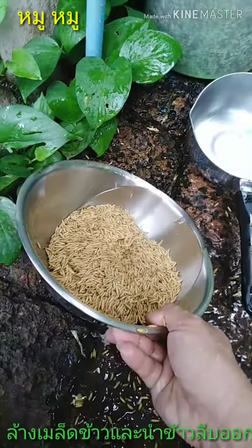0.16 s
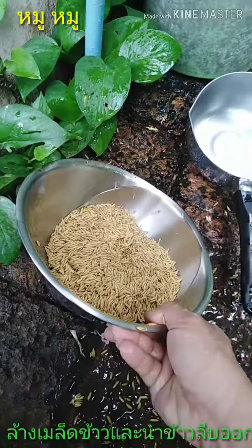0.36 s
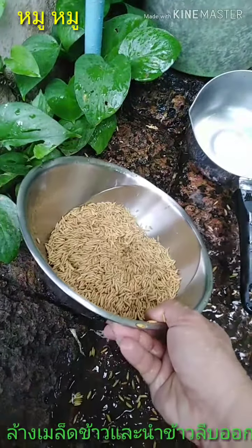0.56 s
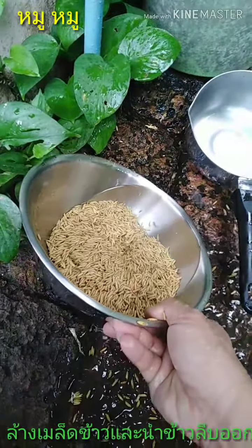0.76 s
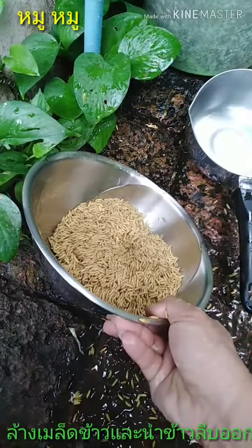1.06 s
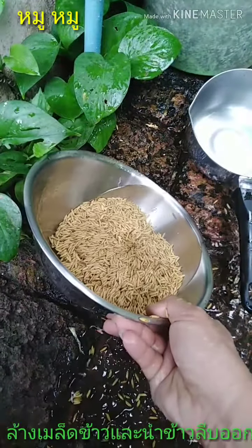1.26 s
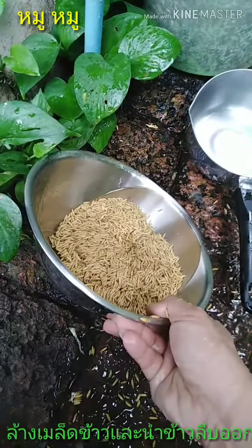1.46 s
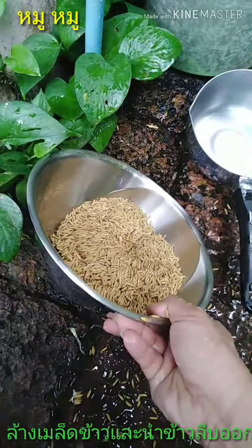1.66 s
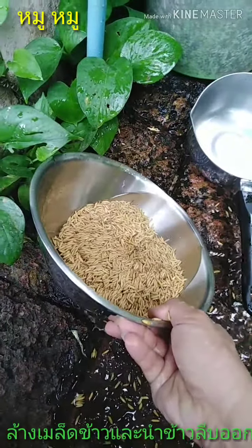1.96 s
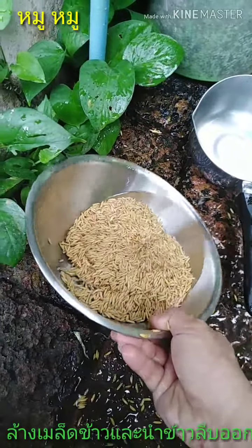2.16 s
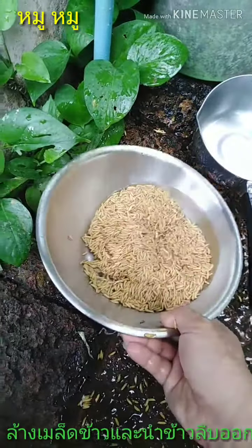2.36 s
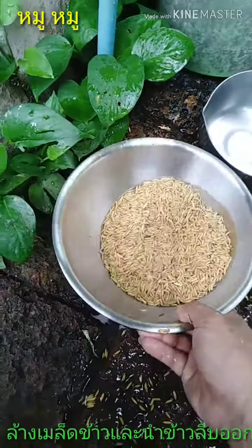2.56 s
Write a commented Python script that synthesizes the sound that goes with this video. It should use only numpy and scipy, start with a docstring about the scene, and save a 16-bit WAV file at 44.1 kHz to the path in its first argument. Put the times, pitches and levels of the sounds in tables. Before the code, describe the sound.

Wet grain rustles in a metal bowl with fine fizzing water, crisp ticks and tiny drips; a hen clucks once early, a bird whistles twice later, then the bowl knocks. Close microphone outdoors, faint traffic rumble.

```python
"""Wet grain drains in a tilted steel bowl held in a garden: clicks over noise make the grain rustle,
the water fizz and a lower trickle; noise puffs tick and short tones drip.
The bowl knocks as ringing modes and drags as wide noise. A bird whistles two scooped tones,
a hen clucks once as rough pulses through a throat, and far traffic rumbles as shaped noise."""
import sys
import numpy as np
from scipy import signal
from scipy.io import wavfile
from scipy.ndimage import uniform_filter1d

SR = 44100
rng = np.random.default_rng(int(sys.argv[2]) if len(sys.argv) > 2 else 0)


def pcm_store(signal):
    """Save signal as 16-bit PCM."""
    levels = np.round(np.clip(np.atleast_2d(signal), -1, 1) * 32767)
    wavfile.write(sys.argv[1], SR, levels.astype(np.int16).T)


N = 119070

# Grain shifting in the bowl: time_s, level_db
RUSTLE_LEVEL = [(0, -56), (.2, -55), (.29, -65.5), (.31, -65), (.33, -51), (.42, -59), (.5, -62),
                (.62, -65.5), (.76, -73), (.8, -59), (1.17, -57), (1.27, -67.5), (1.31, -68), (1.6, -67),
                (1.9, -66), (2.02, -88.5), (2.2, -74), (2.3, -66.5), (2.38, -55), (2.5, -51), (2.54, -43),
                (2.7, -50.5)]
# Grain spectrum: freq_hz, density_db (per Hz, relative)
RUSTLE_SPECTRUM = [(3200, -100), (4300, -12.5), (5200, -2), (6500, 0.5), (7800, -0.5), (8800, -8),
                   (12000, -38), (14500, -63)]
# Fine fizz of draining water: time_s, level_db
FIZZ_LEVEL = [(0, -63.5), (.3, -65.5), (.33, -56), (.55, -65.5), (1.1, -65), (1.2, -69), (1.3, -83),
              (1.33, -67.5), (1.62, -66), (1.9, -64.5), (2.0, -72), (2.08, -79.5), (2.3, -80),
              (2.38, -63.5), (2.52, -58.5), (2.55, -56), (2.7, -62.5)]
# Fizz spectrum: freq_hz, density_db (per Hz, relative)
FIZZ_SPECTRUM = [(6500, -45.5), (8500, 0), (10500, 3.5), (12500, -1.5), (14200, -3.5), (14700, -64)]
# Lower trickle: time_s, level_db
TRICKLE_LEVEL = [(0, -67), (.1, -79.5), (.31, -86), (.34, -66.5), (.55, -77), (.75, -75), (1.28, -87),
                 (1.31, -70.5), (1.5, -69), (1.65, -65.5), (1.9, -57), (2.02, -72.5), (2.1, -114),
                 (2.27, -79), (2.32, -62), (2.5, -65), (2.54, -52), (2.7, -60)]
# Trickle spectrum: freq_hz, density_db (per Hz, relative)
TRICKLE_SPECTRUM = [(1500, -47), (2300, -47), (2750, 19.5), (3100, 9), (3400, 20), (3750, 13), (4000, 18.5),
                    (4350, 18.5), (5000, 6), (6500, -51)]
# Splashy ticks: start_s, level_db, centre_hz, pan_db (left over right), width_hz (each pass), decay_s
TICK_EVENTS = [(0.019, -36.5, 11700, -1, 3020, 0.0031), (0.165, -39, 7500, 20, 800, 0.0032),
               (0.2035, -17, 7920, 0, 2000, 0.002), (0.318, -31, 5960, 17, 2400, 0.0037),
               (0.344, -39, 4400, 6, 1520, 0.0019), (0.5038, -31.5, 5460, 13.5, 4030, 0.0056),
               (0.375, -38, 6560, 10, 4000, 0.0023), (0.391, -32, 5960, 11, 4970, 0.0014),
               (0.774, -48.5, 7500, 29, 990, 0.0035), (0.813, -48.5, 5700, 27.5, 1500, 0.0072),
               (0.958, -39, 10700, -9, 3500, 0.0036), (0.989, -45, 11500, -11, 2500, 0.0032),
               (1.018, -45, 7240, 21, 2000, 0.0028), (1.063, -49, 13000, -14, 3000, 0.003),
               (1.101, -40, 11100, -16, 2000, 0.0024), (1.102, -44, 6100, 18, 1490, 0.0025),
               (1.134, -36, 5700, 22, 2000, 0.002), (1.143, -39.5, 5550, 29, 1770, 0.0022),
               (1.155, -37, 5660, 19, 1790, 0.0017), (1.164, -40.5, 5300, 13, 1200, 0.0034),
               (1.263, -45.5, 6100, 18, 1950, 0.0047), (1.3293, -37, 10300, -12, 3040, 0.0026),
               (1.3707, -41.5, 8200, 3, 4000, 0.0054), (1.438, -38.5, 10550, -8, 2000, 0.0044),
               (1.442, -32.5, 5350, 8.5, 1220, 0.0039), (1.457, -43, 6130, 7, 3000, 0.0037),
               (1.553, -46, 11800, 2, 5000, .002), (1.586, -48, 11500, -2, 2500, 0.0015),
               (1.595, -40, 13000, -2, 2000, 0.0048), (1.611, -26.5, 10860, -8, 1500, 0.002),
               (1.624, -28.5, 6000, 7, 1210, 0.002), (1.741, -45.5, 10360, -11, 1500, 0.0086),
               (1.8186, -46, 5560, 21, 2000, 0.0042), (1.863, -37.5, 8000, 7, 5070, 0.0028),
               (1.912, -42, 4400, 15, 3060, 0.0015), (2.159, -48.5, 5930, 20.5, 495, 0.0051),
               (2.209, -42.5, 5400, 21.5, 2500, 0.0025), (2.3014, -31, 4380, 0, 1540, 0.0021),
               (2.242, -46, 6800, 7, 900, 0.003), (2.277, -40.5, 5700, -3, 1500, 0.0043),
               (2.3513, -29, 6000, 20, 845, 0.003)]
# Tuned drips: start_s, level_db, pitch_hz, pan_db (left over right), length_s (envelope scale)
DRIP_EVENTS = [(0.744, -58.5, 2690, 11, 0.0094), (0.787, -61, 3250, -22, 0.0026),
               (1.303, -43, 4510, 10, 0.0018), (1.304, -59, 3050, -6, 0.006),
               (1.393, -46.5, 4575, 7, 0.0055), (1.5, -59, 2720, 9, 0.0092), (1.523, -60, 2740, 5, 0.0075),
               (1.557, -42.5, 4580, 10, 0.0038), (1.557, -63.5, 3220, 24, 0.0042),
               (1.594, -45.5, 2610, 2, 0.0018), (1.624, -53.5, 2685, 3, 0.0073),
               (1.910, -47, 2565, 0, 0.0032), (1.911, -46, 3280, -8, 0.0029),
               (2.422, -59, 2430, -11, 0.003)]
# Bowl knocks: start_s, level_db, bright_db (per octave about 500 Hz), contact_s,
# upper_db (raises the upper ring, lowers the two middle modes)
KNOCK_EVENTS = [(2.5309, -10.5, 3, 0.00066, -5), (2.5418, -26, -6.5, 0.0018, -11),
                (2.626, -14.5, 2, 0.00054, 10), (2.6307, -29.5, 4.5, 0.00033, 7),
                (2.654, -27, 10, 0.00087, 7)]
# Bowl modes: freq_hz, level_db, t60_s, pan_db (left over right)
BOWL_MODES = [(289, -3.5, 0.049, 3), (349.4, -15, 0.7, -3), (381.7, 3, 0.086, 3.5),
              (577, -10.5, 0.017, -18), (735, 0.5, 0.011, -7), (845, -12, 0.03, -1), (1140, -12, 0.01, -9),
              (1340, -36, 0.31, -2.5), (1626, -25, 0.017, -14), (2340, -17, .012, -14)]
# Bird whistles: start_s, length_s, pitch_hz, level_db, pan_db (left over right),
# scoop_hz (start below pitch), scoop_s, sag_db (by the end)
WHISTLE_NOTES = [(2.008, .166, 2338, -50, -4, 270, .05, -2), (2.232, .125, 3070, -51, -5, 330, .02, -10)]
# Hen throat resonances: freq_hz, width_hz (each pass), level_db
THROAT_RESONANCES = [(710, 74, 10.5), (1096, 347, 15), (1580, 100, -1.5), (1900, 140, -8), (2884, 84, 8.5),
                     (4200, 910, 2.5)]
# Traffic spectrum: freq_hz, density_db (per Hz, relative)
RUMBLE_SPECTRUM = [(20, -77), (38, -22), (52, -9), (70, 1.5), (125, -2.5), (200, -13.5), (400, -19),
                   (650, -27), (950, -35.5), (1150, -52.5), (2200, -54.5), (3200, -67), (9000, -78)]
# Traffic stereo: freq_hz, likeness (left-right, 0 to 1)
RUMBLE_LIKENESS = [(60, 1), (190, 0.97), (350, 0.88), (650, 0.099), (1500, 0.24)]

SPRAY_HZ, SPRAY_WIDTH_HZ, SPRAY_DB = 9650, 3000, -8
DRIP_GLIDE = 0.012  # fraction of pitch
WET_TAIL_DB, WET_TAIL_T60_S = 3, 0.017
MIDDLE_HZ, UPPER_HZ = 640, 840  # where the bowl is struck trades these rings
BOWL_TAIL_DB, BOWL_TAIL_T60_S = -9, 0.075
SCRAPE_S, SCRAPE_RISE_S, SCRAPE_DB = 2.535, 0.0051, -50.5
SCRAPE_HZ, SCRAPE_WIDTH_HZ = 1520, 10600
SWELL_DB, STOP_S, FLUTTER_DB, WAVER_HZ = -16, 0.01, 1.8, 18
CLUCK_S, CLUCK_HZ, CLUCK_DB, CLUCK_PAN_DB = 0.352, 396.5, -38.5, -3.5
CLUCK_RISE_S, CLUCK_T60_S, CLUCK_ROUGH = 0.041, 0.15, 0.76
GARDEN_DB, GARDEN_T60_S = -4, 0.42
RUMBLE_DB = -40.5
BASS_CUT_HZ, EDGE_HZ = 42, 15300


def amp(db):
    """dB to gain."""
    return 10 ** (np.asarray(db) / 20)


def evened(x):
    """Scales to rms 1."""
    x = np.asarray(x)
    return x / np.sqrt(np.mean(x ** 2) + 1e-20)


def drift(x, size):
    """Noise smoothed twice over size samples, rms 1."""
    return evened(uniform_filter1d(uniform_filter1d(x, size), size))


def read(points, hz):
    """Reads a curve on a log-frequency axis."""
    f, value = np.transpose(points)
    return np.interp(np.log(hz + 1), np.log(f + 1), value)


def panned(pan_db):
    """Left and right level offsets in dB, as a column."""
    return np.array([[pan_db / 2], [-pan_db / 2]])


def add(mix, start_s, sound, pan_db):
    """Mixes a sound in at start_s; positive pan leans left."""
    part = mix[:, round(start_s * SR):][:, :len(sound)]
    part += amp(panned(pan_db)) * sound[:part.shape[1]]


def resonate(x, hz, width_hz, passes):
    """A resonance of gain about 1 at its centre, applied several times."""
    turn = np.exp(2j * np.pi * hz * np.arange(len(x)) / SR)
    r = np.exp(-np.pi * abs(width_hz) / SR)
    for _ in range(passes):
        x = 2 * (turn * signal.lfilter([1 - r], [1, -r], x / turn)).real
    return x


def coloured(x, spectrum, patchy_db, size):
    """Shapes two channels by a spectrum with drifting patches common to both; rms 1."""
    overlap = size * 3 // 4
    hz, _, z = signal.stft(x, SR, nperseg=size, noverlap=overlap)
    patches = rng.standard_normal(z.shape[1:])
    patches = evened(uniform_filter1d(uniform_filter1d(patches, 6, 0), 12, 1))
    z = z * amp(read(spectrum, hz)[:, None] + patchy_db * patches)
    shaped = signal.istft(z, SR, nperseg=size, noverlap=overlap)[1]
    return evened(shaped[:, :N])


def tail(x, t60_s):
    """A diffuse decaying noise tail of energy about 1, different per channel."""
    t = np.arange(SR // 2) / SR
    h = rng.standard_normal((2, len(t))) * amp(-60 * t / t60_s)
    return signal.fftconvolve(x, h / np.linalg.norm(h[0]), axes=1)[:, :N]


def patter(curve, spectrum, per_s, spread_db, smooth, alike, pan_db, patchy_db, flicker_db):
    """Dense tiny clicks of uneven size over smooth noise, on a level curve that flickers."""
    sizes = amp(spread_db * np.minimum(rng.exponential(1, (3, N)), 5))
    clicks = sizes * (rng.random((3, N)) < per_s / SR)
    raw = evened(clicks * rng.standard_normal((3, N))) + smooth * rng.standard_normal((3, N))
    pair = raw[:2] + alike * raw[2]  # third stream is common to both channels
    sound = coloured(pair, spectrum, patchy_db, size=256)
    flicker = drift(rng.standard_normal(N), 500)
    s, db = np.transpose(curve)
    level_db = np.interp(np.arange(N) / SR, s, db) + flicker_db * flicker
    return sound * amp(level_db + panned(pan_db))


def rustle():
    """Shifting grain: dense clicks over noise, strongest around 5 to 8 kHz."""
    return patter(RUSTLE_LEVEL, RUSTLE_SPECTRUM, per_s=1500, spread_db=3.0, smooth=0.8,
                  alike=0.4, pan_db=6.5, patchy_db=2.5, flicker_db=1.5)


def fizz():
    """Draining water: sparser, more uneven clicks over noise, above about 8 kHz."""
    return patter(FIZZ_LEVEL, FIZZ_SPECTRUM, per_s=700, spread_db=4.6, smooth=0.9,
                  alike=0.6, pan_db=-8, patchy_db=3.2, flicker_db=2.5)


def trickle():
    """Lower trickle: clicks over noise in several bands from about 2.7 to 5 kHz."""
    return patter(TRICKLE_LEVEL, TRICKLE_SPECTRUM, per_s=1000, spread_db=-6.5, smooth=0.97,
                  alike=0.13, pan_db=-1.5, patchy_db=4.0, flicker_db=2.0)


def ticks():
    """Each tick is a noise puff in a resonance, with a broad bright spray."""
    mix, t = np.zeros((2, N)), np.arange(1500) / SR
    for start_s, db, hz, pan_db, width_hz, decay_s in TICK_EVENTS:
        puff = rng.standard_normal(len(t))
        shape = np.minimum(t * 1500, 1) * np.exp(-(t / decay_s) ** 2)
        # second differences tilt the noise to the treble
        edge = np.diff(puff * shape, n=2, prepend=[0, 0])
        tick = resonate(edge, hz, width_hz, passes=3)
        tick /= np.sqrt(np.mean(tick ** 2) / np.mean(shape ** 2))
        spray_edge = np.diff(puff[::-1] * shape, n=2, prepend=[0, 0]) / 3
        spray = resonate(spray_edge, SPRAY_HZ, SPRAY_WIDTH_HZ, passes=2)
        add(mix, start_s, amp(db - 14) * (tick + amp(SPRAY_DB) * spray), pan_db)
    return mix


def drips():
    """Each drip is a short tone gliding upward, with a small noise splash below its pitch."""
    mix, t = np.zeros((2, N)), np.arange(1500) / SR
    for start_s, db, hz, pan_db, length_s in DRIP_EVENTS:
        u = t / length_s
        puff = rng.standard_normal(len(t)) * np.exp(-t / 0.0022)
        splash = resonate(puff, 0.81 * hz, 2500, passes=2)
        add(mix, start_s, amp(db - 8) * splash, pan_db)
        tone = np.sin(2 * np.pi * hz * t * (1 + DRIP_GLIDE * (u - 1)))
        add(mix, start_s, amp(db) * 1.63 * u * np.exp(-u ** 2) * tone, pan_db)
    return mix


def drops():
    """Ticks and drips with a short diffuse wet tail."""
    mix = ticks() + drips()
    return mix + amp(WET_TAIL_DB) * tail(mix, WET_TAIL_T60_S)


def knocks():
    """Each knock is a short smooth push ringing the same modes; every mode leans its own way."""
    mix, t = np.zeros((2, N)), np.arange(SR // 4) / SR
    for start_s, db, bright_db, contact_s, upper_db in KNOCK_EVENTS:
        push = np.sin(np.pi * np.clip(t[:200] / contact_s, 0, 1)) ** 2
        push /= push.sum()
        for hz, mode_db, t60_s, pan_db in BOWL_MODES:
            is_upper, is_middle = abs(hz - UPPER_HZ) < 60, abs(hz - MIDDLE_HZ) < 120
            spot_db = upper_db * (float(is_upper) - float(is_middle))
            level_db = mode_db + spot_db + bright_db * np.log2(hz / 500) - 60 * t / t60_s
            ring = amp(level_db) * np.sin(2 * np.pi * hz * t + 0.7)
            add(mix, start_s, -amp(db - 11) * np.convolve(ring, push), pan_db)
    return mix + amp(BOWL_TAIL_DB) * tail(mix, BOWL_TAIL_T60_S)


def scrape():
    """The base drags after the first knock: wide noise that rises fast and holds to the end."""
    noise = rng.standard_normal((2, N))
    drag = evened([resonate(x, SCRAPE_HZ, SCRAPE_WIDTH_HZ, passes=2) for x in noise])
    rise = np.clip((np.arange(N) / SR - SCRAPE_S) / SCRAPE_RISE_S, 0, 1)
    return drag * amp(SCRAPE_DB) * rise


def whistles():
    """Sine whistles scoop up to pitch while they swell, with slight flutter and waver."""
    mix = np.zeros((2, N))
    for start_s, length_s, hz, db, pan_db, scoop_hz, scoop_s, sag_db in WHISTLE_NOTES:
        t = np.arange(0, length_s, 1 / SR)
        below = np.clip(1 - t / scoop_s, 0, 1)
        flutter, waver = drift(rng.standard_normal((2, len(t))), 300)
        pitch_hz = hz - scoop_hz * below + WAVER_HZ * waver
        level_db = db + SWELL_DB * below + sag_db * t / length_s + FLUTTER_DB * flutter
        stop = np.clip((length_s - t) / STOP_S, 0, 1)
        tone = np.sin(2 * np.pi * np.cumsum(pitch_hz) / SR)
        add(mix, start_s, amp(level_db) * stop * tone, pan_db)
    return mix


def cluck():
    """A hen's rough pulses, harmonics mixed with noise, through throat resonances."""
    mix, t = np.zeros((2, N)), np.arange(SR // 4) / SR
    jitter = evened(uniform_filter1d(rng.standard_normal(len(t)), 200))
    turns = np.cumsum(CLUCK_HZ * (1 + 0.022 * jitter)) / SR
    pulses = sum(np.cos(2 * np.pi * k * turns) for k in range(1, 13))
    drive = (1 - CLUCK_ROUGH) * evened(pulses) + CLUCK_ROUGH * rng.standard_normal(len(t))
    voice = evened(sum(amp(db) * resonate(drive, hz, width_hz, passes=2)
                       for hz, width_hz, db in THROAT_RESONANCES))
    envelope = np.minimum(t / CLUCK_RISE_S, 1) * amp(CLUCK_DB - 60 * t / CLUCK_T60_S)
    add(mix, CLUCK_S, voice * envelope, CLUCK_PAN_DB)
    return mix


def birds():
    """Whistles and cluck with the diffuse tail of the garden."""
    mix = whistles() + cluck()
    return mix + amp(GARDEN_DB) * tail(mix, GARDEN_T60_S)


def rumble():
    """Distant traffic: shaped noise, nearly alike in both channels in the bass."""
    a, b = np.fft.rfft(rng.standard_normal((2, N)))
    same = np.clip(read(RUMBLE_LIKENESS, np.fft.rfftfreq(N, 1 / SR)), 0, 1)
    pair = np.fft.irfft([a, same * a + np.sqrt(1 - same ** 2) * b], N)
    return amp(RUMBLE_DB) * coloured(pair, RUMBLE_SPECTRUM, patchy_db=1.85, size=4096)


def scene():
    """All sources together."""
    grain_and_water = rustle() + fizz() + trickle() + drops()
    return grain_and_water + knocks() + scrape() + birds() + rumble()


def record(dry):
    """The microphone drops the deepest bass; then a steep low-pass limits the band."""
    bass_cut = signal.butter(3, BASS_CUT_HZ, "high", fs=SR, output="sos")
    thin = signal.sosfilt(bass_cut, dry)
    band_limit = signal.firwin(511, EDGE_HZ, window=("kaiser", 9), fs=SR)
    return signal.oaconvolve(thin, band_limit[None], "same")


dry = scene()
out = record(dry)
pcm_store(out)
```